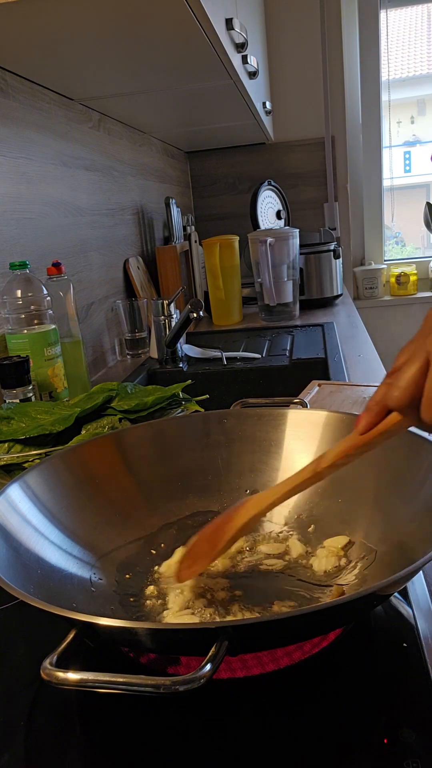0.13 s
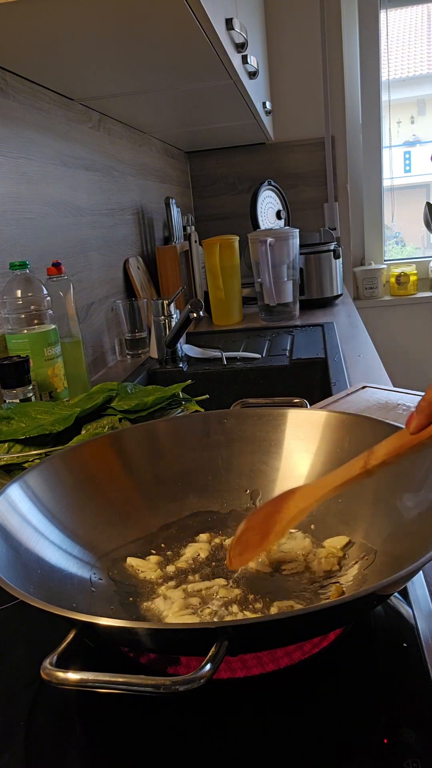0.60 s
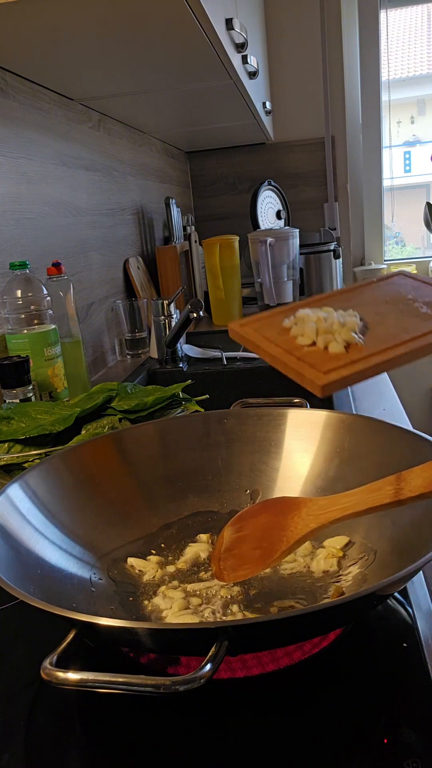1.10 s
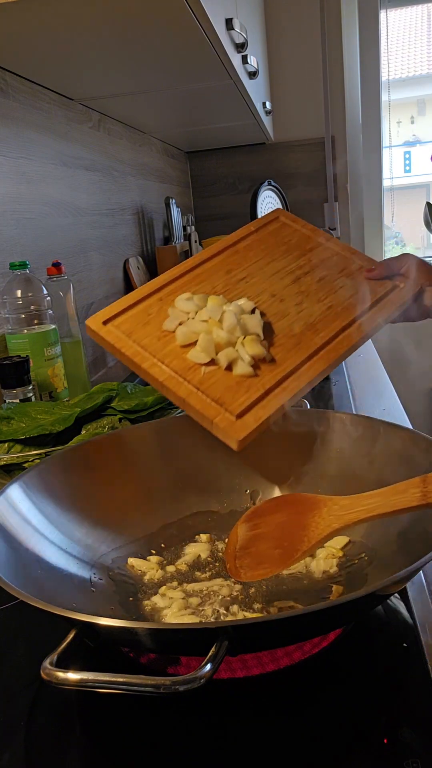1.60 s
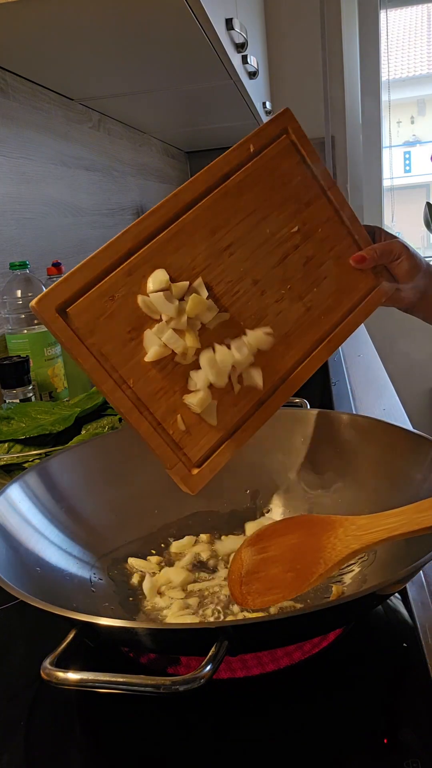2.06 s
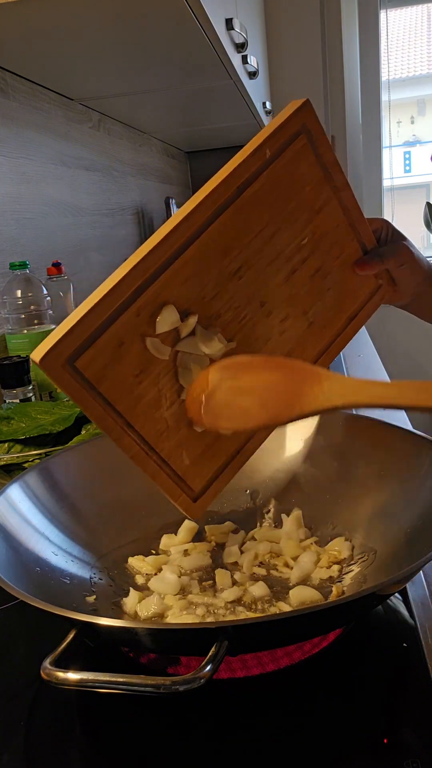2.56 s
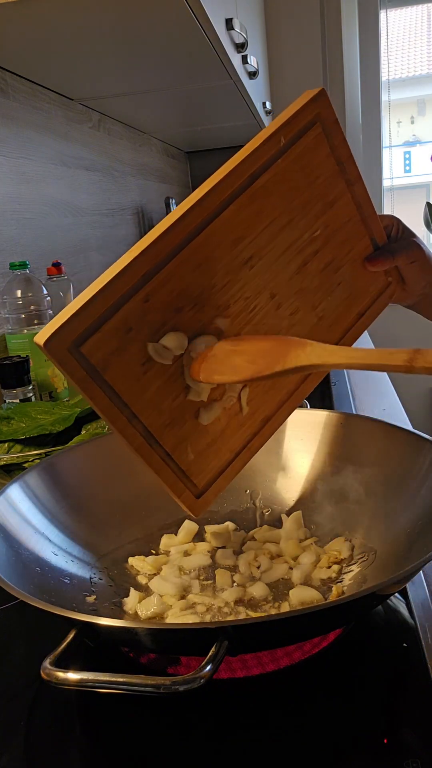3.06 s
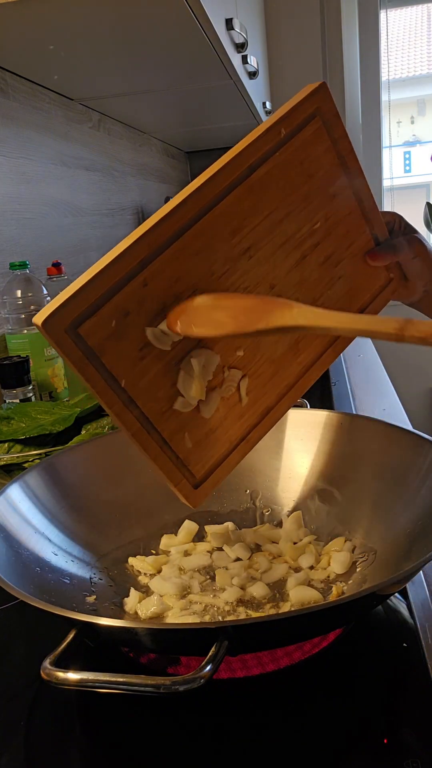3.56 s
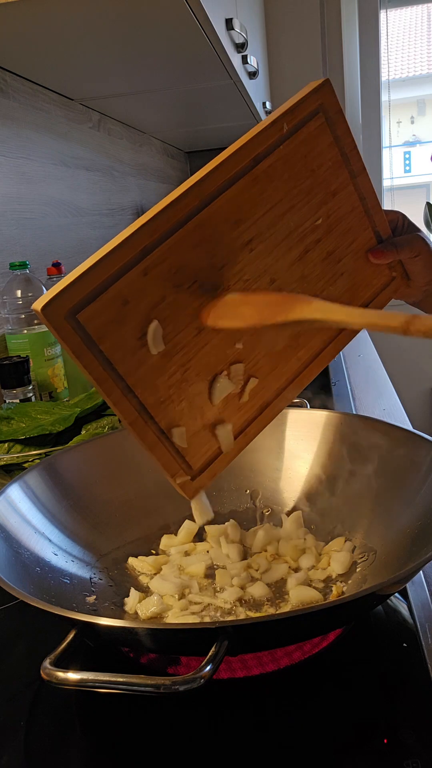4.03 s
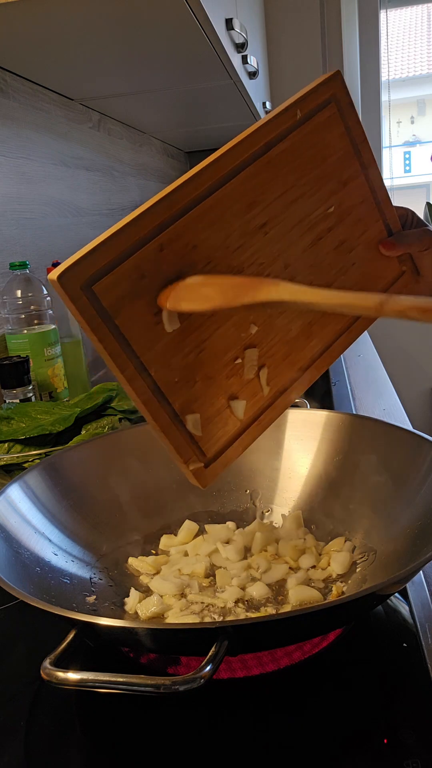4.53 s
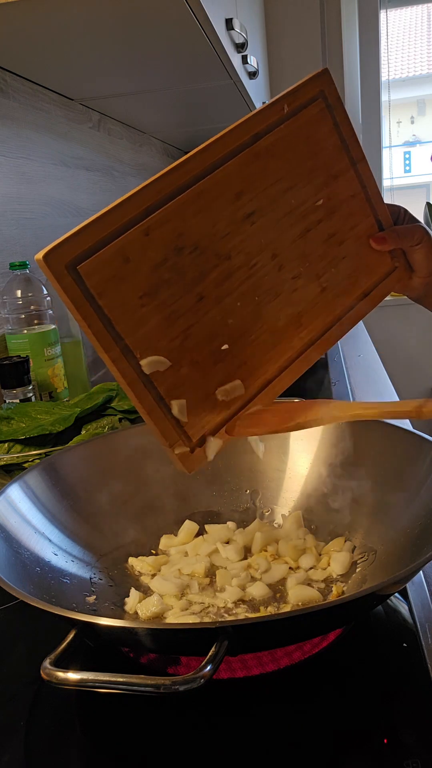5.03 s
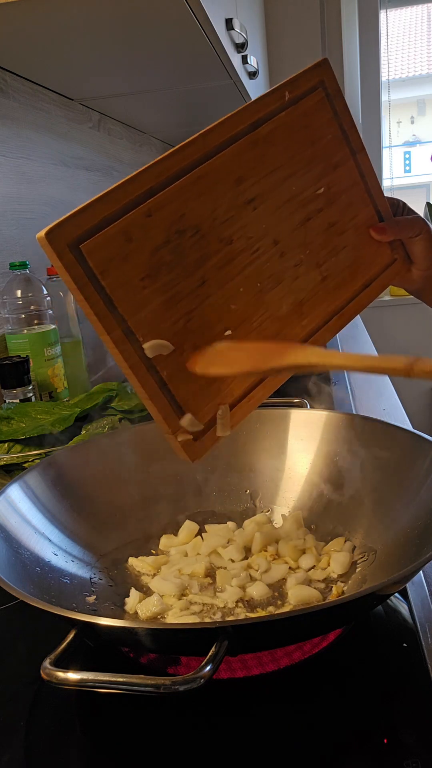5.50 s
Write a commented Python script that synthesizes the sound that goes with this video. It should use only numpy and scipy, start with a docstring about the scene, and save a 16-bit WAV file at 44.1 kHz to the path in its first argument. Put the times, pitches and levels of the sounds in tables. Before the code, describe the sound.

Soft oil sizzle and wok knocks, a sudden flare of frying at two seconds, dense sharp pops, and dry spoon taps on a board.

```python
"""Chopped garlic fries softly in a steel wok: noise and clumped, ringing bubble bursts.
From the start a wooden spoon stirs (stick-slip clicks, rumble), knocks the wok's modes and sets it swaying.
At 2 s a second load drops in: the sizzle flares and strong pops (hiss, crack, ring, fizz) crowd in.
From 2.9 s the spoon taps and scrapes a cutting board held above the wok.
Two ports close by hear it all, each sound followed by echoes of bowl, wall and hood."""
import sys
import numpy as np
from scipy import signal
from scipy.fft import rfft, irfft, next_fast_len
from scipy.io import wavfile

SR = 44100
rng = np.random.default_rng(int(sys.argv[2]) if len(sys.argv) > 2 else 0)


def put_to_file(sound):
    """Save the sound as 16-bit audio at rate SR, in the file named by the first command-line argument."""
    columns = np.atleast_2d(sound).T  # one column per channel
    safe = np.clip(columns, -1, 1)
    whole_steps = np.round(safe * 32767)
    wavfile.write(sys.argv[1], SR, whole_steps.astype(np.int16))


def to_linear_factor(level_db):
    """Convert decibel levels (scalar or array-like) to linear amplitude factors."""
    exponent = np.asarray(level_db, float) / 20
    return 10 ** exponent


N = 248283

# All table levels are relative; mix gains follow.
# vigour of frying, set by the middling bubbles: t/s, level/dB
FRY_VIGOUR = [(0.0, -53), (0.3, -54), (0.9, -55), (1.4, -56), (1.97, -54.5), (2.05, -42), (2.11, -35.5),
              (2.23, -40.5), (2.33, -35.5), (2.74, -34.5), (3.26, -35.5), (3.45, -38), (4.14, -37),
              (4.45, -38.5), (4.99, -38), (5.3, -37.5), (5.63, -35)]
# spectrum of frying: f/Hz, density/dB per Hz
FRY_SPECTRUM = [(210, -24.5), (350, -21.5), (445, -31), (611, -13), (971, -24.5), (1380, -11.5),
                (1780, -10), (2870, -11.5), (3310, -7.5), (5430, -2.5), (6680, -4.5), (7470, -5),
                (9950, -3), (11300, -4), (15800, 2.5)]
# air resonances of the bowl: f/Hz, width/Hz, level/dB (used up to 9)
BOWL_RESONANCES = [(588, 320, 12.5), (1388, 41, 3), (1541, 11, 5), (2427, 57, 3.5), (2876, 48, 8),
                   (5280, 700, -11.5), (7230, 32, 8), (7680, 150, 3), (11430, 440, -0.5)]
# pushes that sway the whole wok on the hob: start t/s, level/dB, starting f/Hz, swell time/s
SWAY_PUSHES = [(0.0, -50, 63, 0.036), (0.129, -52.5, 68.6, 0.037), (0.3, -59, 66.4, 0.13),
               (0.6, -48, 66.1, 0.11), (0.868, -48.5, 69, 0.2), (1.979, -49.5, 68, 0.044),
               (2.171, -53, 66.4, .06), (2.499, -65, 76.5, 0.31), (3.07, -56, 69, 0.043),
               (3.27, -56, 63, 0.045)]
# stirring and shoving: middle t/s, length/s, drag level/dB, rumble level/dB
STROKES = [(0.0, 0.15, -62, -43.5), (0.385, 0.15, -56, -49), (0.51, 0.18, -62, -53.5),
           (0.64, 0.041, -65, -52.5), (0.745, 0.24, -61.5, -46.5), (1.896, 0.36, -81, -68),
           (2.32, 0.22, -56, -48), (2.18, 0.15, -70, -50), (2.614, 0.54, -68, -63),
           (3.23, 0.22, -57.5, -55), (4.05, 0.33, -61, -70), (4.46, 0.33, -60, -72),
           (4.986, 0.11, -68, -79), (5.323, 0.077, -74, -56)]
# spectrum of the dragging spoon: f/Hz, density/dB per Hz
DRAG_SPECTRUM = [(88, -11), (150, -7.5), (240, -20), (322, -17.5), (454, -16), (1030, -23), (1230, -36.5),
                 (2500, -22.5), (3250, -23), (5500, -120)]
# spectrum of the rumble through the hob: f/Hz, density/dB per Hz
RUMBLE_SPECTRUM = [(13, -52), (22, -47), (32, 3.5), (92, 9), (110, 4.5), (128, 8.5), (178, -2.5),
                   (220, -0.5), (290, -26), (480, -120)]
# loud steam bursts: t/s, peak level/dB, pitch f/Hz, ring/cycles, crack level over peak/dB
LOUD_POPS = [(0.0205, -22, 4830, 3, -7.5), (0.1969, -37, 7640, 9.2, -3), (0.2245, -39, 5780, 9, -9),
             (0.4657, -40, 9500, 8.7, -2), (0.4747, -36, 5980, 5.4, 4), (0.4975, -36, 13140, 10, -15),
             (0.6039, -36, 7000, 27, -11), (0.8714, -38, 4370, 15, -1), (1.1602, -29, 4960, 4, -10),
             (1.414, -33.5, 5830, 14, -20), (1.4228, -42, 5600, 8.2, -9), (1.61, -44, 9290, 9.3, -1),
             (1.77, -28, 4470, 6.6, -8), (2.0696, -20.5, 14100, 4.7, -11), (2.1356, -23, 7000, 5.7, -0.5),
             (2.1608, -23, 3600, 7.2, -14), (2.2286, -24.5, 4260, 8.8, 5), (2.3256, -16.5, 4950, 6.4, -3.5),
             (2.4026, -23, 5870, 10, -19), (2.4635, -20, 4950, 8.4, -20), (2.4769, -31, 5340, 8.8, -1),
             (2.5578, -28, 5640, 8, 3), (2.5778, -22, 5550, 8.1, -12), (2.6627, -28.5, 7800, 6.4, 5),
             (2.708, -20.5, 4840, 6.9, -0.5), (2.7592, -33, 5400, 10, -11), (2.8115, -15.5, 4840, 7.9, -8),
             (2.8212, -16.5, 5030, 4.6, -1.5), (2.8364, -25, 5440, 8.8, 3), (2.939, -26, 5300, 3.8, 6),
             (2.9703, -27.5, 4430, 29, -15), (3.0213, -29.5, 5300, 7.9, 8), (3.0328, -25, 2720, 8.6, 8),
             (3.0817, -19.5, 5200, 6, -5.5), (3.1419, -25, 1710, 3.3, 1), (3.1961, -19, 5500, 3.2, -5),
             (3.2773, -18.5, 6440, 5.2, -6), (3.3092, -20.5, 5300, 5.6, -1),
             (3.3383, -12.5, 3470, 2.6, -3.5), (3.3604, -18, 5900, 5.8, 3), (3.463, -36, 2400, 11.4, 16),
             (3.5249, -24.5, 4850, 20, -18), (3.6177, -27, 4930, 6.2, 4.5), (3.667, -23.5, 5340, 2.7, 2),
             (3.7058, -27, 2410, 2.7, 11.5), (3.8139, -12.5, 5860, 4.7, -15),
             (3.8382, -28.5, 11900, 5.9, 5.5), (3.8925, -25.5, 4940, 21, -23), (3.9128, -32, 5600, 6, -4),
             (3.9276, -20.5, 5250, 8.1, -2), (3.9839, -22, 5100, 15, 0), (4.0595, -30, 11490, 9, -8),
             (4.1447, -12, 5500, 2.5, -5.5), (4.2386, -11.5, 6100, 4.9, -10),
             (4.2753, -14.5, 4440, 2.9, 0.5), (4.3939, -27.5, 2500, 1.4, 16.5),
             (4.4092, -22, 4750, 3.1, 3.5), (4.4861, -21.5, 4670, 2.2, 7), (4.4959, -20, 6750, 7.8, -7),
             (4.6101, -30.5, 4960, 5.1, 6.5), (4.6424, -26.5, 4770, 10, -15), (4.7144, -21, 7450, 9.5, -12),
             (4.7793, -29, 5650, 9.3, 7), (4.8277, -24.5, 5170, 7.3, 2.5), (4.8794, -37, 2900, 5.7, -9),
             (4.9521, -25, 4570, 4.3, 3), (5.0384, -19.5, 4970, 4.2, -4), (5.0754, -17, 6500, 4.8, -11),
             (5.1169, -19, 5450, 3.8, 5), (5.1188, -14, 8460, 5.8, -5), (5.1207, -16, 5560, 5.9, -33),
             (5.2296, -28, 4750, 12, -14), (5.4059, -20, 5570, 9.6, -18), (5.4307, -34.5, 6060, 8, -13),
             (5.4646, -29, 5420, 11, -14), (5.515, -27, 8700, 7, 4.5), (5.5515, -33.5, 1450, 4.1, -9),
             (5.6008, -23, 5400, 8.5, -11)]
# spoon and garlic on the wok: t/s, peak level/dB, f favoured by the contact/Hz, deep-mode level/dB
WOK_BLOWS = [(0.019, -68, 600, -47), (0.306, -32.5, 280, -53), (0.309, -44.5, 840, -54),
             (0.382, -39, 280, -49), (0.401, -50.5, 1100, -47), (0.44, -47, 280, -60),
             (0.544, -52, 300, -51), (0.643, -41.5, 494, -49), (0.678, -48, 595, -47),
             (0.755, -44, 1200, -54), (0.763, -28.5, 1660, -39), (0.772, -40, 800, -43),
             (0.8, -42, 510, -42), (1.995, -48, 650, -56), (2.009, -28, 720, -57), (2.042, -47, 550, -46),
             (2.077, -46, 348, -55), (2.212, -31, 780, -55), (2.226, -51, 1200, -42.5),
             (2.269, -40, 750, -50), (2.308, -35, 664, -45.5), (2.375, -45, 593, -47.5),
             (3.234, -42, 755, -51.5)]
# modes of the wok: f/Hz, level/dB, t60/s
WOK_MODES = [(122.1, 1, 0.84), (149.7, 5, 0.2), (187.5, 0.5, 0.26), (242.4, 6, 0.1), (324, -5, 0.11),
             (391.5, -5, 0.18), (497, 2, 0.028), (578, 6.5, 0.034), (699, 2.5, 0.055), (827, -2, 0.028),
             (1026, -1, 0.016), (1040, -0.5, 0.042), (1270, 5.5, 0.034), (1510, -0.5, 0.038),
             (1447, 1.5, 0.037), (1680, -6, 0.044), (1974, 5, 0.028), (2160, 1.5, 0.021), (2430, 5, 0.013),
             (2940, -5, 0.019)]
# spoon on the board: t/s, peak level/dB, brightness/dB, weight/dB
BOARD_TAPS = [(2.91, -25, -21, -10), (3.713, -36.5, 1, -2.5), (4.066, -26, -32, -6.5),
              (4.54, -19.5, -9.5, -10.5), (4.559, -29, -7, -7), (4.877, -31, 0.5, -20),
              (4.901, -28, -8, -6), (5.282, -40.5, -1, -1), (5.324, -36, 5, -28), (5.328, -27, 5.5, -33)]
# modes of the board: f/Hz, level/dB, t60/s
BOARD_MODES = [(270, 14, 0.014), (367, 7.5, 0.059), (556, 6.5, 0.017), (665, 1.5, 0.1), (825, 1, 0.023),
               (1368, 0, 0.033), (1572, -1, 0.041), (2000, 8.5, 0.012), (2540, 6.5, 0.014)]
# first echoes at each port: delay t/s, level/dB
ECHOES_LEFT = [(.0012, -19), (.0023, -3), (.0040, -19), (.0067, -3.5), (.0097, -2)]
ECHOES_RIGHT = [(.0013, -15), (.0025, -7), (.0037, 0.5), (.0079, -1), (.0098, -4.5)]
# colour difference of the ports: f/Hz, left minus right level/dB
LEFT_LEAD = [(60, 2), (99, -1.5), (160, 0.5), (270, 1), (450, -2.5), (740, -1.5), (1220, 0.5), (2010, 5),
             (3330, 1.5), (5500, 3.5), (9080, 3.5), (15000, 5.5)]

PAN_SPOTS = 7
FULL_FRY_DB, HISS_WAVER_DB = -38, 2.2
# level at FULL_FRY_DB; share of the vigour's swing followed; lag of the big bubbles
SPRAY_DB, SPRAY_FOLLOWS = -38, 0.66
BIG_DB, BIG_FOLLOWS, BIG_LATE_S = -44.5, 0.89, 0.1
SWAY_RISE_HZ_PER_S = 4.73
IDLE_DRAG_DB, IDLE_RUMBLE_DB = -72.5, -64.5
SMALL_POPS, SMALL_POP_DB, SMALL_POP_SPREAD_DB = 110, 6, 4.5   # levels over the vigour
SMALL_POP_HZ, SMALL_POP_SPREAD_OCTAVES = 6430, 0.49
LEAK_S, SWELL_CYCLES, FIZZ_DB = .015, 2.1, -30.5
CRACK_REACH = 1.95   # upper edge as a multiple of the pitch
CONTACT_DB_PER_OCTAVE2, DEEP_HZ, DEEP_DB_PER_OCTAVE, LIGHT_HZ = 14.5, 154, 6.5, 900
GRAZE_S, GRAZE_DB, TICK_DB = .006, -15, 3.5
KITCHEN_T60_S, KITCHEN_DB = .3, -29
ALIKE_BELOW_HZ, ECHO_CUT_HZ = 1100, 13300


def rms_one(x):
    """Scales to unit rms."""
    return x / np.sqrt(np.mean(x ** 2) + 1e-20)


def in_time(rows):
    """Interpolates level against time at every sample."""
    t_s, level_db = np.transpose(rows)
    return np.interp(np.arange(N) / SR, t_s, level_db)


def at_hz(points, hz):
    """Interpolates level on a log frequency axis."""
    points = np.array(points)
    return np.interp(np.log(hz), np.log(points[:, 0]), points[:, 1])


def cut(x, hz, kind):
    """Second-order Butterworth design."""
    return signal.sosfilt(signal.butter(2, hz, kind, fs=SR, output="sos"), x)


def colour(x, db_at):
    """Minimum-phase filter, gain in dB a function of frequency, by cepstrum folding."""
    hz = np.maximum(np.fft.rfftfreq(8192, 1 / SR), 1)
    cepstrum = irfft(np.log(to_linear_factor(db_at(hz))))
    cepstrum[1:4096] *= 2
    cepstrum[4097:] = 0
    response = irfft(np.exp(rfft(cepstrum)))
    return signal.fftconvolve(np.atleast_2d(x), response[None], axes=1)[:, :N].squeeze()


def drift(rate_hz):
    """Slow noise of rms 1: white noise through a double pole."""
    r = np.exp(-2 * np.pi * rate_hz / SR)
    noise = rng.standard_normal(N + SR)
    return rms_one(signal.lfilter([1], [1, -2 * r, r * r], noise)[SR:])   # settled part


def ring(excitation, hz, t60_s):
    """Two-pole resonator: a unit click starts a decaying sine of height 1."""
    r = to_linear_factor(-60 / (t60_s * SR))
    w = 2 * np.pi * hz / SR
    return signal.lfilter([0, np.sin(w)], [1, -2 * r * np.cos(w), r * r], excitation + 1e-18)


def clicks(per_s, spread_db):
    """Random clicks of either sign, most small, a few large."""
    sizes = to_linear_factor(spread_db * np.minimum(rng.exponential(1, N), 5)) * rng.choice([-1, 1], N)
    return sizes * (rng.random(N) < per_s / SR)


def bowl(x):
    """Colour of the pan: broad spectrum with air resonances standing out."""
    def db_at(hz):
        peaks = sum(to_linear_factor(min(db, 9)) / (1 + (2 * (hz - f) / width) ** 2)
                    for f, width, db in BOWL_RESONANCES)
        return at_hz(FRY_SPECTRUM, hz) + 20 * np.log10(1 + peaks)
    return colour(x, db_at)


def sizzle():
    """Steam bubbles burst in clumps over hiss; each rings a few cycles at a pitch set by its size."""
    vigour_db = in_time(FRY_VIGOUR)
    late_db = in_time(np.array(FRY_VIGOUR) + [BIG_LATE_S, 0])
    spray_db = SPRAY_DB + SPRAY_FOLLOWS * (vigour_db - FULL_FRY_DB)
    big_db = BIG_DB + BIG_FOLLOWS * (late_db - FULL_FRY_DB)
    bursts = clicks(4000 * to_linear_factor(4 * drift(25)), spread_db=3.2)
    pitch_of_burst = rng.integers(0, 18, N)
    grains = np.zeros(N)
    for k, hz in enumerate(np.geomspace(500, 15000, 18)):
        tilt = hz ** 1.36 / (hz + 6000) ** .5
        grains += ring(bursts * (pitch_of_burst == k), hz, 10.8 / hz) * tilt
    hiss = to_linear_factor(-4.5 + HISS_WAVER_DB * drift(3.7)) * rng.standard_normal(N)
    fry = bowl(rms_one(grains) + hiss)
    big = to_linear_factor(big_db) * rms_one(cut(fry, 3900, "low"))
    middling = to_linear_factor(vigour_db) * rms_one(cut(fry, [3300, 8500], "band"))
    spray = to_linear_factor(spray_db) * rms_one(cut(fry, 11700, "high"))
    fry = big - middling + spray
    # bursting jumps about the pan every 200 samples
    spot = np.repeat(rng.integers(0, PAN_SPOTS, N // 200 + 1), 200)[:N]
    return to_linear_factor(-2.5) * fry * (spot == np.arange(PAN_SPOTS)[:, None])


def sway():
    """Slowest motion of the bowl: a low hum swells after each push and dies, its pitch rising a little."""
    out = np.zeros(N)
    for s, db, hz, swell_s in SWAY_PUSHES:
        t = np.maximum(np.arange(N) / SR - s, 0)
        swell = t / swell_s * np.exp(1 - t / swell_s)
        cycles = (hz + SWAY_RISE_HZ_PER_S * t / 2) * t
        out += to_linear_factor(db + 3.5) * swell * np.sin(2 * np.pi * cycles)
    return out


def drag():
    """Dense stick-slip clicks and low noise through the hob; both swell and fade with each stroke."""
    s, length_s, drag_db, rumble_db = np.transpose(STROKES)
    swell = np.exp(-(2 * (np.arange(N)[:, None] / SR - s) / length_s) ** 2)
    slips = clicks(600 * to_linear_factor(3.5 * drift(15)), spread_db=1.0)
    slips = colour(slips, lambda hz: at_hz(DRAG_SPECTRUM, hz))
    rumble = colour(rng.standard_normal(N), lambda hz: at_hz(RUMBLE_SPECTRUM, hz))
    drag_gain = to_linear_factor(IDLE_DRAG_DB) + swell @ to_linear_factor(drag_db + 0.5)
    rumble_gain = to_linear_factor(IDLE_RUMBLE_DB) + swell @ to_linear_factor(rumble_db - 5.0)
    return drag_gain * rms_one(slips) + rumble_gain * rms_one(rumble)


def small_pops():
    """Lesser bursts at random times, level following the vigour; rows as in LOUD_POPS."""
    luck = rng.normal(0, 1, (SMALL_POPS, 4))
    s = rng.uniform(LEAK_S, N / SR - .01, SMALL_POPS)
    vigour_db = np.interp(s, *np.transpose(FRY_VIGOUR))
    db = vigour_db + SMALL_POP_DB + SMALL_POP_SPREAD_DB * np.minimum(luck[:, 0], 1.5)
    hz = np.clip(SMALL_POP_HZ * 2 ** (SMALL_POP_SPREAD_OCTAVES * luck[:, 1]), 1000, 15000)
    cycles = 7.3 + 1.6 * luck[:, 2]
    crack_db = -9 + 4.3 * np.minimum(luck[:, 3], 1)
    return np.transpose([s, db, hz, cycles, crack_db])


def pops():
    """A large bubble leaks a growing hiss, cracks and rings; a fizz of droplets dies near its pitch."""
    out = np.zeros((PAN_SPOTS, N))
    rows = np.vstack([LOUD_POPS, small_pops()])
    lead = int(LEAK_S * SR)
    t = np.arange(-lead, SR // 12) / SR
    droplet_db = np.where(t < 0, -4 + 25 * t / LEAK_S, -60 * t / 0.063)
    droplets = rng.standard_normal((len(rows), len(t))) ** 3 / 4 * to_linear_factor(droplet_db)
    for k, (s, db, hz, cycles, crack_db) in enumerate(rows):
        i = round(s * SR) - lead
        excite = to_linear_factor(FIZZ_DB) * droplets[k]
        excite[lead] = -1
        # a small source sends out little below its own pitch
        slope = np.diff(excite, prepend=0) / (2 * np.sin(np.pi * hz / SR))
        # the ring builds up over a windowed burst
        n = np.arange(int(SWELL_CYCLES * SR / hz))
        swell = np.cos(2 * np.pi * hz * n / SR) * np.hanning(len(n)) * 4 / len(n)
        bubble = ring(np.convolve(slope, swell)[:len(t)], hz, max(cycles, 1) / hz)
        bubble = bubble * to_linear_factor(-at_hz(FRY_SPECTRUM, hz))   # offsets the pan's broad colour
        crack = cut(excite, [hz / 5.04, min(CRACK_REACH * hz, 15000)], "band")
        pop = to_linear_factor(db) * (bubble + to_linear_factor(crack_db + 11.5) * crack)
        out[k % PAN_SPOTS, i:i + len(t)] += pop[:N - i]
    return to_linear_factor(10.5) * bowl(out)


def wok():
    """Blows wake modes near the contact's pitch, and deep ones by weight; a graze leads, a rattle follows."""
    s, peak_db, contact_hz, weight_db = np.transpose(WOK_BLOWS)
    at = np.round(s * SR).astype(int)
    out = np.zeros(N)
    chance_db = rng.normal(0, 1.0, (len(s), len(WOK_MODES)))
    t = np.arange(SR // 6) / SR
    rattle = rng.standard_normal(len(t)) * (rng.random(len(t)) < .03) * to_linear_factor(-17 - 60 * t / 0.18)
    rattle[0] = 1
    lead = int(GRAZE_S * SR)
    graze = to_linear_factor(GRAZE_DB) * np.linspace(0, 1, lead) ** 2 * rng.standard_normal(lead)
    contact = np.r_[graze, rattle]
    for k, (hz, db, t60_s) in enumerate(WOK_MODES):
        near = to_linear_factor(peak_db - CONTACT_DB_PER_OCTAVE2 * np.log2(hz / contact_hz) ** 2)
        deep = to_linear_factor(weight_db - DEEP_DB_PER_OCTAVE * max(np.log2(hz / DEEP_HZ), 0))
        strikes = np.zeros(N)
        strikes[at] = np.hypot(near, deep) * to_linear_factor(db - 4.5 + chance_db[:, k])
        if hz > LIGHT_HZ:   # only the light upper modes follow graze and rattle
            strikes = signal.oaconvolve(strikes, contact)[lead:lead + N]
        out += ring(strikes, hz, t60_s) * (-1) ** k
    ticks = np.zeros(N)
    ticks[at] = to_linear_factor(peak_db + TICK_DB) * (contact_hz / LIGHT_HZ) ** 2
    ticks = signal.oaconvolve(ticks, contact)[lead:lead + N]
    return cut(out, 4300, "low") + cut(ticks, [2500, 9000], "band")


def board():
    """Dry wooden taps: brightness drives the upper modes, weight the lowest."""
    s, peak_db, bright_db, weight_db = np.transpose(BOARD_TAPS)
    out = np.zeros(N)
    chance_db = rng.normal(0, 1.5, (len(s), len(BOARD_MODES)))
    for k, (hz, db, t60_s) in enumerate(BOARD_MODES):
        touch_db = (hz > 1000) * bright_db + (hz < 450) * weight_db
        strikes = np.zeros(N)
        strikes[np.round(s * SR).astype(int)] = to_linear_factor(peak_db + touch_db + db - 9.0 + chance_db[:, k])
        out += ring(strikes, hz, t60_s) * (-1) ** k
    return cut(out, [200, 3000], "band")   # a small board sends out no deep bass


def kitchen(spots):
    """Direct sound, first echoes and diffuse tail per spot; long waves reach both ports nearly alike."""
    t = np.arange(int(KITCHEN_T60_S * SR)) / SR
    tail_gain = to_linear_factor(KITCHEN_DB - 60 * t / KITCHEN_T60_S) * (t > .001)
    answer = rng.choice([-1., 1.], (len(spots), 2, len(t))) * tail_gain
    spot, port = np.indices((len(spots), 2))
    direct = rng.integers(0, 4, spot.shape)   # delay in samples: paths differ by a finger's breadth
    for side, echoes in enumerate([ECHOES_LEFT, ECHOES_RIGHT]):
        for s, db in echoes:
            # paths differ from spot to spot
            lags = np.round(s * SR * rng.uniform(.93, 1.07, len(spots))).astype(int)
            answer[np.arange(len(spots)), side, lags] += to_linear_factor(db)
    answer = cut(answer, ECHO_CUT_HZ, "low")   # echoes are duller
    answer[spot, port, direct] = 1
    size = next_fast_len(N + len(t))
    spectrum = np.sum(rfft(spots, size)[:, None] * rfft(answer, size), axis=0)
    heard = irfft(spectrum, size)[:, :N]
    alike = to_linear_factor(1.0) * spots.sum(axis=0) + 0.23 * heard
    return cut(heard, ALIKE_BELOW_HZ, "high") - cut(alike, ALIKE_BELOW_HZ, "low")


def scene():
    """Pan spots, wok body, board and drag, each from its own place in the kitchen."""
    return to_linear_factor(-4.5) * kitchen(np.vstack([sizzle() + pops(), wok() + sway(), board(), drag()]))


def top_cut(x):
    """Nothing passes above the cut-off."""
    return signal.sosfilt(signal.butter(12, 16960, fs=SR, output="sos"), x)


def record(dry):
    """Two ports of differing colour; a steep low-pass cuts the top."""
    left = colour(dry[0], lambda hz: at_hz(LEFT_LEAD, hz) / 2)
    right = colour(dry[1], lambda hz: -at_hz(LEFT_LEAD, hz) / 2)
    low_pass = signal.cheby2(14, 60, 16250, fs=SR, output="sos")
    ports = signal.sosfilt(low_pass, [left, right])
    return top_cut(ports)


dry = scene()
out = record(dry)
put_to_file(out)
```